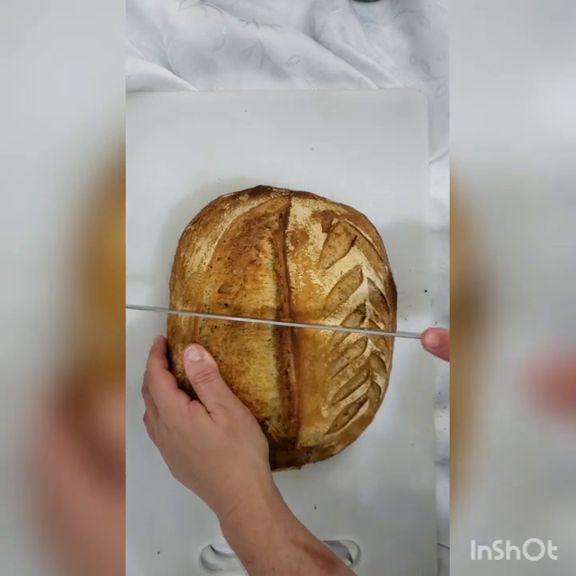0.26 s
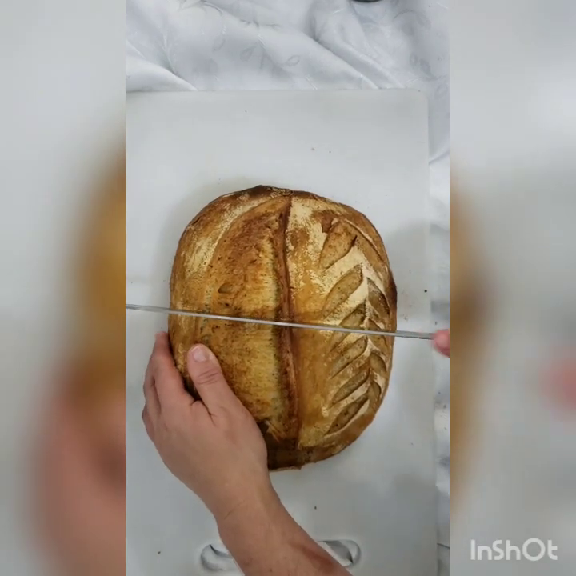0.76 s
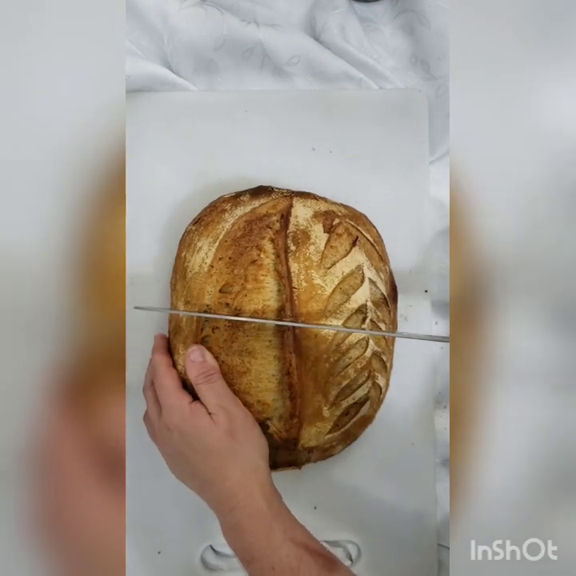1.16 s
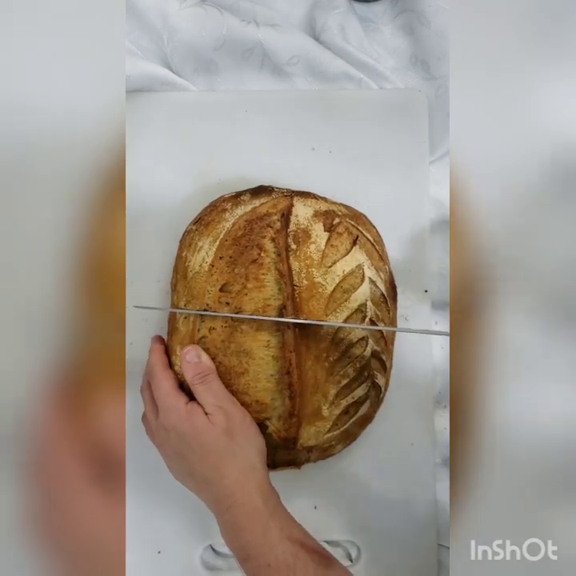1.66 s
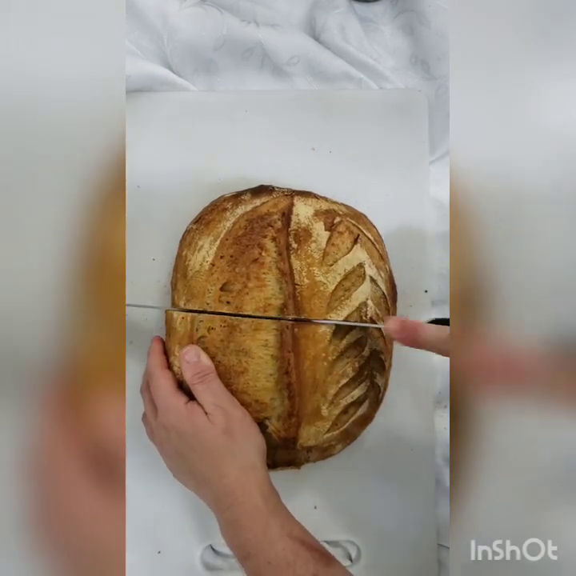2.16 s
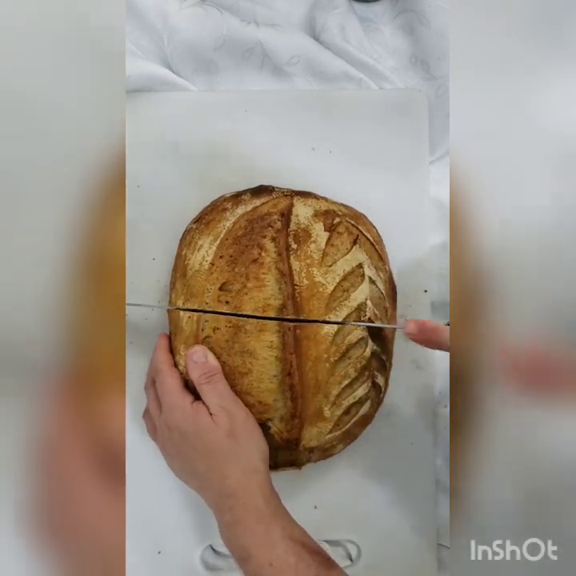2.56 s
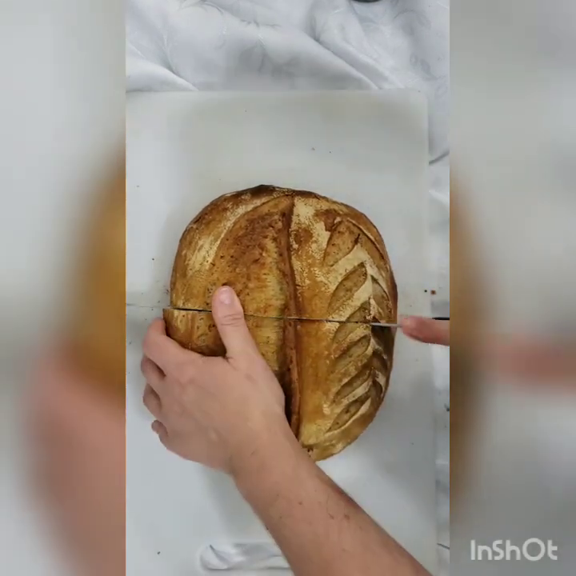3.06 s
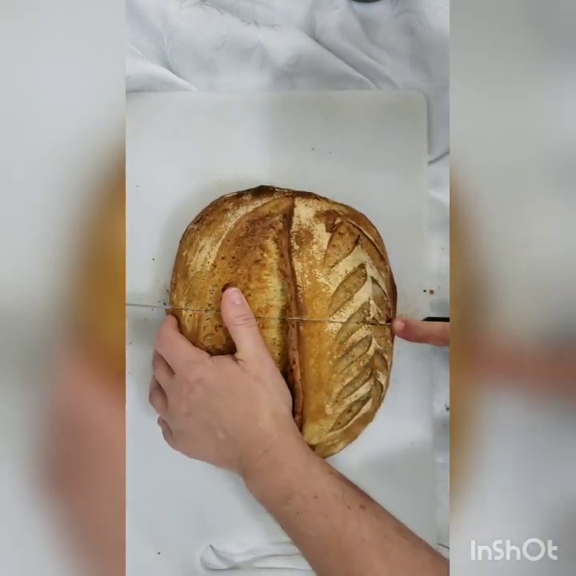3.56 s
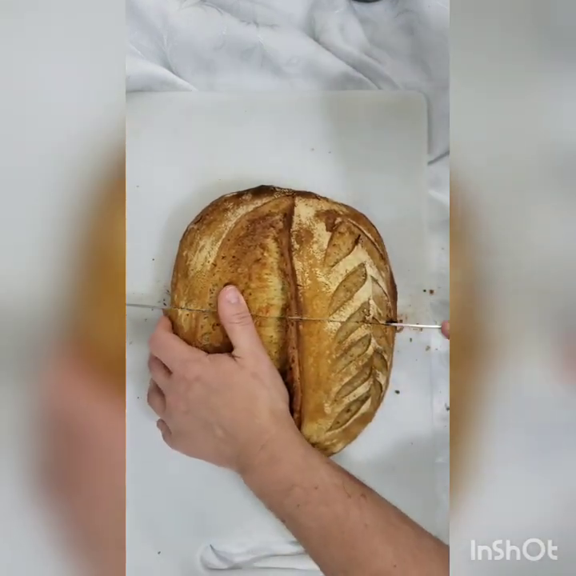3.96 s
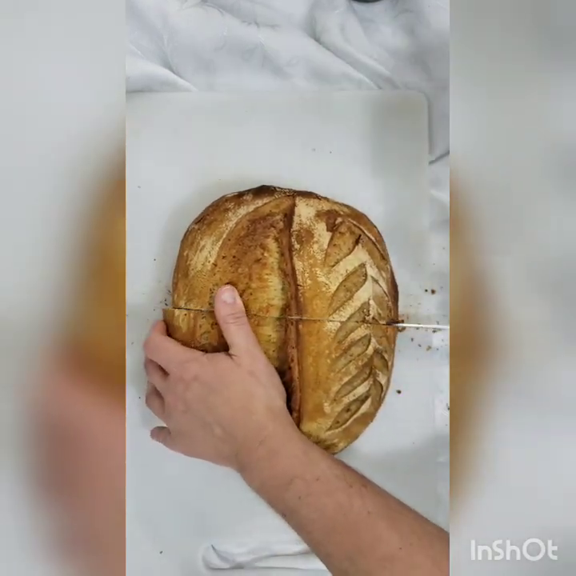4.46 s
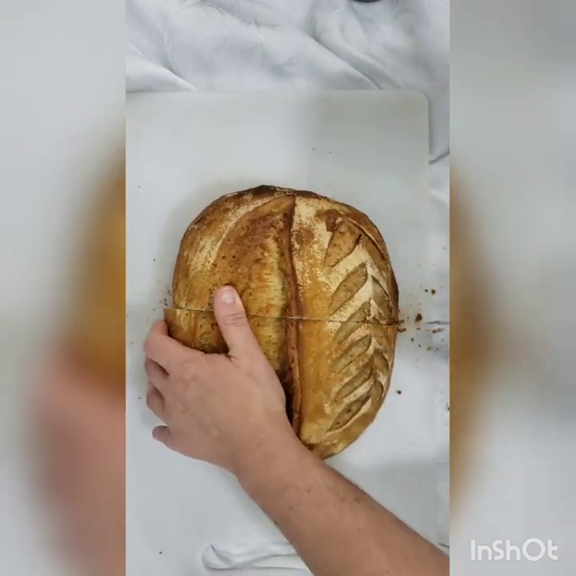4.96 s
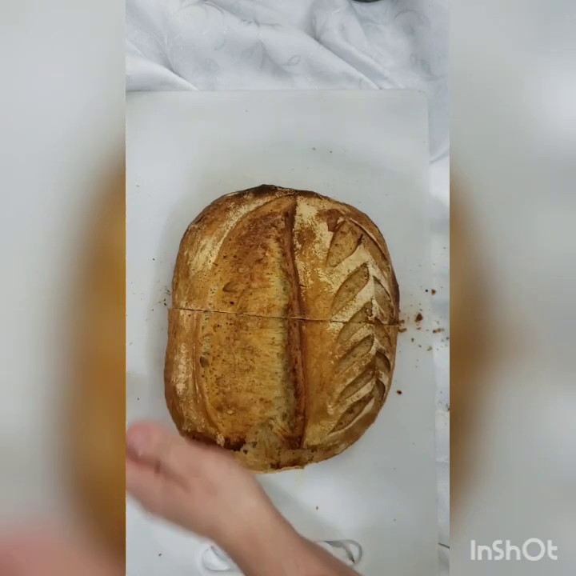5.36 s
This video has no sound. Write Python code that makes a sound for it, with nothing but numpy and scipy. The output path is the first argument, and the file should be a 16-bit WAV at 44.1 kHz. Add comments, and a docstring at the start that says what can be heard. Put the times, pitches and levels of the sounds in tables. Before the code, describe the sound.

A serrated knife saws back and forth through a crusty loaf with rasping, crackling strokes, then is put down with a short clatter.

```python
"""A serrated bread knife saws through a crusty loaf on a board: tooth pulses and crumb drag excite loaf
resonances, while coloured bursts of micro-breaks make tearing, rasp and splinters. Flakes snap off as short
noise bursts and the blade's edge ticks. The knife is laid down with a clatter of ringing modes and noise
cracks; a hand brushes with swelling hiss. A small kitchen reverberates over a low murmur and a faint hum."""
import sys
import numpy as np
from scipy import signal
from scipy.fft import rfft, irfft
from scipy.io import wavfile
from scipy.ndimage import uniform_filter1d

SR = 44100
rng = np.random.default_rng(int(sys.argv[2]) if len(sys.argv) > 2 else 0)


def to_wav(s):
    """Save 16-bit WAV."""
    ch = np.atleast_2d(s).T  # columns
    pcm = np.round(np.clip(ch, -1, 1) * 32767)  # PCM
    wavfile.write(sys.argv[1], SR, pcm.astype(np.int16))


N = 247703
T = np.arange(N) / SR  # time [s]
TOP_HZ = 15900

# Levels in the tables are relative within each layer; the mix sets the final gains.
# Blade strokes, the last three sliding out of the cut: (start [s], bite [s], hold [s], ease [s],
# lean: gain over the hold [dB], thrum [dB], knock [dB], tearing [dB], splinters [dB],
# top tooth rate [Hz], unevenness [tooth spacings])
STROKES = [ (0.0, 0.097, 0.09, 0.14, -2.5, -23.5, -31.5, -39.5, -36, 151.9, 0.097),
           (0.311, 0.079, 0.075, 0.087, 0, -30.5, -33.5, -43.5, -40.5, 168.8, 0.13),
           (0.534, 0.086, 0.22, 0.12, 2.5, -31.5, -37, -45, -40, 129.4, 0.093),
           (0.94, .079, 0.1, 0.074, 3, -37.5, -44, -47, -41, 129.6, 0.14),
           (1.205, 0.057, 0.18, 0.082, 9.5, -33.5, -37, -40.5, -38, 138, 0.19),
           (1.561, 0.049, 0.086, 0.12, -1.5, -31, -35, -45.5, -43.5, 141.6, 0.067),
           (1.813, 0.025, .21, 0.089, 6, -31, -36, -42, -36.5, 143, 0.17),
           (2.135, .05, .12, .15, -1, -47.5, -44.5, -49, -47.5, 144.7, 0.059),
           (2.424, .05, 0.18, .15, -4, -32.5, -34, -38, -33, 135.1, 0.15),
           (3.135, 0.1, 0.011, 0.077, -3, -39.5, -38, -41.5, -39, 117.6, 0.34),
           (3.329, 0.0449, 0.17, .18, -2.5, -35.5, -38, -41, -38, 141.3, 0.15),
           (3.739, 0.091, 0.041, 0.12, 2, -38, -42.5, -48, -44.5, 140.6, 0.1),
           (3.95, 0.086, 0.021, 0.092, -3.5, -42.5, -51, -53, -47.5, 122.5, 0.15),
           (4.204, 0.048, 0.081, 0.12, -2, -38.5, -41.5, -47.5, -47, 141.6, 0.17),
           (4.332, 0.029, 0.63, 0.068, 1, -40.5, -47, -55, -67.5, 140, .3),
           (4.721, 0.068, 0.036, 0.096, -8.5, -48, -50, -49.5, -58.5, 140.1, 0.14), ]
# Depth below the held level at stroke start: thrum, knock, tearing, splinters (depth [dB])
BITE_DEPTH_DB = [20.5, 20, 16.7, 18.5]
# Depth below the held level at stroke end, same layers (depth [dB])
EASE_DEPTH_DB = [13.8, 20.1, 22.4, 24.5]
# Low resonances of the loaf on its board: (frequency [Hz], width [Hz], level [dB])
THRUM_MODES = [(53.7, 18, -9.5), (84.4, 12.3, -9), (115.8, 15, -7.5), (142.6, 3.2, 4)]
# Higher resonances of the loaf: (frequency [Hz], width [Hz], level [dB])
KNOCK_MODES = [(212, 18, -5.5), (260.3, 27, 1), (298, 51, -0.5), (368.3, 25, -4.5), (468, 120, -34.5)]
# Colour of tearing crumb: (frequency [Hz], level [dB])
TEAR_COLOUR = [(250, -17.5), (480, 3.5), (590, 2.5), (650, 3), (780, 4.5), (830, -1), (890, 1), (960, 2),
               (1080, 0), (1200, 0.5), (1450, -7), (1800, -14), (3000, -28.5)]
# Colour of teeth scraping hard crust: (frequency [Hz], level [dB])
RASP_COLOUR = [(900, -13.5), (1500, -0.5), (1900, -4), (2300, -1.5), (2720, -1.5), (3050, -4), (3700, -5),
               (6000, -17.5)]
# Colour of splintering crust: (frequency [Hz], level [dB])
SPLINTER_COLOUR = [(600, -19), (1800, -4.5), (3000, -10.5), (4200, 0.5), (5500, -2), (7500, -3.5),
                   (9500, -6.5), (11500, 0.5), (13000, 2.5), (15500, -1.5)]
# Large crust flakes snapping off: (time [s], level [dB], crumbling time [s], body re treble [dB])
SNAPS = [(.031, -40, 0.0033, 1), (0.1296, -26, 0.0046, -1), (0.1521, -26.5, 0.0094, 7),
         (0.2158, -21.5, .0038, 2), (0.3666, -29, 0.0045, 2), (.532, -42, 0.0013, -6),
         (0.5727, -31.5, 0.0043, 3.5), (0.8193, -18.5, 0.00092, 7.5), (0.8941, -24, 0.0027, -4),
         (.99, -32, .002, 8), (1.2015, -30, 0.002, 7.5), (1.2539, -19, .0045, 1.5),
         (1.3286, -22.5, 0.0044, 2), (1.413, -20.5, 0.0033, 11), (1.462, -23, 0.0028, -12),
         (1.594, -28.5, 0.0024, -6), (1.7852, -29, 0.0011, 6.5), (1.8287, -27, 0.0013, -5),
         (1.8433, -23.5, 0.015, 1.5), (1.9677, -19, 0.0024, -2), (1.9879, -22, .004, 7),
         (2.3296, -28.5, 0.0015, 3), (2.451, -36, 0.0044, 16.5), (2.5417, -14.5, 0.0059, 0.5),
         (2.569, -24, 0.0038, 5), (2.6352, -25, 0.0023, -4), (3.109, -28, 0.0047, 6),
         (3.17, -34, 0.0035, -3), (3.215, -25, 0.005, -22), (3.272, -32, .003, -2), (3.348, -32, 0.0045, 5),
         (3.4077, -24, .0051, 2), (3.4506, -17, 0.0044, -25), (3.5003, -23, 0.0068, -15),
         (3.7684, -38, 0.0042, 4), (3.9871, -35.5, 0.0031, 11), (4.15, -30.5, 0.00058, -8),
         (4.5506, -35.5, 0.0011, 2), (4.6705, -40, 0.00036, -6)]
# Small chance flakes: rate, level over the splinters, its spread, crumbling time
CRUMBS_PER_S, CRUMB_DB, CRUMB_SPREAD_DB, CRUMB_S = 11, 0.5, 4, 0.0019
# Loaf rocking against its board: (time [s], level [dB])
BUMPS = [(0.095, -16), (0.162, -13.5), (0.747, -13.5), (1.988, -21), (2.58, -21), (3.373, -38),
         (4.216, -21.5), (4.383, -24)]
# Squeaks and ticks of the blade's edge: (time [s], level [dB], mean pitch [Hz], rise time [s])
TICKS = [(.152, -34, 4700, .004), (2.162, -16, 11800, .00045), (2.170, -33, 12600, .0003),
         (2.185, -28, 12500, .0003), (2.2915, -35, 14200, .0003)]
# Knife meeting board or worktop: (time [s], strength [dB], contact time [s])
BLOWS = [(1.594, -9.5, 0.00012), (2.192, -10.5, .0007), (4.219, -9, 0.0015), (4.9534, 6, 0.00014),
         (4.96, -6, .0009), (4.9614, 0.5, 0.00031), (4.9665, -4, 0.000092), (4.9713, -2.5, 0.0002),
         (4.9743, 6, 0.00025), (4.983, 0.5, 0.00014), (4.9918, 2, 0.00012), (5.01, 1.5, .0008)]
# Ringing of knife and worktop: (frequency [Hz], T60 [s], level [dB])
WORKTOP_MODES = [(144, 0.41, -22), (253, 0.3, -10), (304, 0.13, -10.5), (337, 0.046, -8),
                 (412, 0.056, -3.5), (526, 0.058, -10), (805, 0.059, -3.5), (777, 0.027, -7),
                 (1077, 0.01, 3), (1066, 0.067, -2.5), (1155, 0.044, -19), (1216, 0.023, -5.5),
                 (1510, 0.012, -25), (1730, .05, -20), (1940, 0.035, -12), (2133, 0.032, -9),
                 (2710, 0.053, -13)]
# Colour of the contact's crack: (frequency [Hz], level [dB])
CRACK_COLOUR = [(150, -24), (500, -12.5), (1200, 1), (2200, -18.5), (3200, -14), (5500, -20.5), (9000, -32),
                (16000, -42)]
# Swishes as the hand shifts its grip and lets go: (start [s], rise time [s], level [dB])
SWISHES = [(2.858, 0.071, -43), (4.74, 0.052, -53), (4.9, 0.055, -53), (5.17, 0.073, -57),
           (5.439, 0.06, -50)]
# Colour of the hand brushing: (frequency [Hz], level [dB])
BRUSH_COLOUR = [(300, -4.5), (1200, -2), (1850, -8.5), (2200, 3), (4300, 1), (6000, -1), (9000, -6.5),
                (13000, -3), (16000, -7.5)]
# Colour of the room's murmur: (frequency [Hz], level [dB])
MURMUR_COLOUR = [(25, -14), (55, 3), (90, -2), (145, 0), (200, -6), (270, -5), (420, -8), (600, -18),
                 (1500, -23), (4000, -27), (7000, -31), (8500, -37), (16000, -36)]
# Appliance hum: (frequency [Hz], rms level [dB])
HUM = [(118.4, -63.5), (236.9, -64.5), (414.5, -63)]
# Kitchen reverberation: (frequency [Hz], T60 [s])
ROOM_T60 = [(150, 0.17), (1000, 0.4), (4000, 0.35), (14000, 0.3)]


def undb(db):
    """Decibels to gain."""
    return 10 ** (np.asarray(db) / 20)


def unit(x):
    """Scale to rms 1."""
    return x / np.sqrt(np.mean(x ** 2))


def even(x, size=2200):
    """Level to rms 1 over a sliding twentieth of a second, keeping the fine grain."""
    power = np.mean(np.atleast_2d(x) ** 2, axis=0)
    return x / np.sqrt(uniform_filter1d(power, size) + 1e-6 * np.mean(x ** 2))


def add(track, start_s, sound):
    """Mix a sound in at start_s."""
    i = int(start_s * SR)
    track[..., i:i + sound.shape[-1]] += sound[..., :N - i]


def convolve(x, response):
    """Pass a sound through an impulse response."""
    return signal.fftconvolve(np.atleast_2d(x), np.atleast_2d(response), axes=-1)[:, :N]


def colour(x, points, size=2048):
    """Causal (minimum-phase) filter through (frequency [Hz], level [dB]) points."""
    hz, db = np.transpose(points)
    grid_hz = np.arange(size // 2 + 1) * SR / size
    gain = undb(np.interp(np.log(grid_hz + 1), np.log(hz), db))
    # fold the cepstrum onto positive time
    cepstrum = irfft(np.log(gain))
    cepstrum[1:size // 2] *= 2
    cepstrum[size // 2 + 1:] = 0
    return convolve(x, irfft(np.exp(rfft(cepstrum))))


def band(x, lo_hz, hi_hz, order=2):
    """Butterworth band-pass."""
    edges_hz = [lo_hz, min(hi_hz, SR / 2 - 1)]
    return signal.sosfilt(signal.butter(order, edges_hz, "band", fs=SR, output="sos"), x)


def resonate(x, modes):
    """Sum of resonances (frequency [Hz], width [Hz], level [dB])."""
    return sum(undb(db) * signal.lfilter(*signal.iirpeak(hz, hz / width_hz, fs=SR), x)
               for hz, width_hz, db in modes)


def stereo(mid, side, side_db):
    """Left and right from a shared and an opposed part."""
    return mid + undb(side_db) * side * np.array([[1], [-1]])


def swell(t, rise_s):
    """Envelope that peaks at 1 after rise_s and dies away."""
    return t / rise_s * np.exp(1 - t / rise_s)


def stroke_levels():
    """Gains of thrum, knock, tearing and splinters: each stroke bites, leans on the loaf and eases off."""
    bite_db, ease_db = np.array(BITE_DEPTH_DB)[:, None], np.array(EASE_DEPTH_DB)[:, None]
    t, power = T[::50], 0
    for start_s, bite_s, hold_s, ease_s, lean_db, *held_db, _, _ in STROKES:
        since_bite_s = t - start_s - bite_s
        biting = np.maximum(-since_bite_s / bite_s, 0)
        leaning = np.clip(since_bite_s / hold_s, 0, 1) - .5
        easing = np.maximum((since_bite_s - hold_s) / ease_s, 0)
        level_db = np.array(held_db)[:, None] - bite_db * biting + lean_db * leaning - ease_db * easing
        power = power + undb(level_db) ** 2
    return [np.interp(T, t, np.sqrt(layer)) for layer in power]


def tooth_catches(scatter_db, drag_db):
    """A pulse whenever a tooth catches, and the irregular drag of the crumb between them."""
    pulses, drag = np.zeros(N), np.zeros(N)
    for start_s, bite_s, hold_s, ease_s, *_, tooth_hz, jitter in STROKES:
        length_s = bite_s + hold_s + ease_s
        i = np.arange(max(int(start_s * SR), 0), int((start_s + length_s) * SR))
        # blade speeds up from the turn and slows into the next
        swing = (T[i] - start_s) / length_s
        speed = np.abs(np.sin(np.pi * swing)) ** .36
        passed = np.cumsum(tooth_hz * speed) / SR
        chance = rng.standard_normal((200, 2))
        teeth = np.arange(len(chance)) + .5 + jitter * chance[:, 0]
        caught = teeth < passed[-1]
        # an uneven stroke also bites with uneven force and drags more
        force_db = scatter_db * np.sqrt(abs(jitter)) * chance[caught, 1]
        pulses[i[np.searchsorted(passed, teeth[caught])]] = undb(force_db)
        drag[i] = undb(drag_db) * abs(jitter)
    return unit(pulses), drag * rng.standard_normal(N)


def fractures(catches, per_s, scatter_db, tooth_share, crumble_s):
    """Strength of breaking: cracks start at the teeth or on their own and each runs on for a moment."""
    stray_db = scatter_db * np.clip(rng.standard_normal(N), -2, 2)
    stray = (rng.random(N) < per_s / SR) * undb(stray_db)
    power = tooth_share * catches ** 2 / np.mean(catches ** 2) + stray ** 2 / np.mean(stray ** 2)
    return np.sqrt(signal.lfilter([1], [1, -np.exp(-1 / (crumble_s * SR))], power) + 1e-9)


def grit(per_s, side_db):
    """Dense microscopic breaks, each radiating differently to the two channels."""
    breaks = rng.random(N) < per_s / SR
    return unit(stereo(breaks * rng.standard_normal(N), breaks * rng.standard_normal(N), side_db))


def flakes(x, spread_db, per_s):
    """Fragments of changing size: third-octaves from 700 Hz up, and all below, flare independently."""
    edges_hz = np.concatenate([[0], 700 * 2 ** (np.arange(14) / 3), [SR]])
    spectrum = rfft(x, 2 ** 18)
    hz = np.arange(2 ** 17 + 1) * SR / 2 ** 18
    out = 0
    for lo_hz, hi_hz in zip(edges_hz, edges_hz[1:]):
        chance = np.clip(rng.standard_normal(4096), -2, 2)
        flare = np.interp(T * per_s, np.arange(len(chance)), undb(spread_db * chance))
        out = out + flare * irfft(spectrum * ((hz >= lo_hz) & (hz < hi_hz)))[:, :N]
    return out


def loaf(push, modes, lo_hz, hi_hz, side_db):
    """The blade's push shakes one group of the loaf's resonances."""
    return even(band(resonate(stereo(push, rng.standard_normal(N), side_db), modes), lo_hz, hi_hz))


def resistance(spread_db, per_s):
    """Gain drifting at random: the crust is harder in some places than in others."""
    chance = np.clip(rng.standard_normal(1024), -2, 2)
    return np.interp(T * per_s, np.arange(len(chance)), undb(spread_db * chance))


def sawing(thrum_gain, knock_gain, tear_gain, splinter_gain):
    """The same teeth drive the loaf's thrum and knock, the tearing crumb, the rasp and the splinters."""
    catches, drag = tooth_catches(scatter_db=5, drag_db=14.0)
    breaking = fractures(catches, per_s=380, scatter_db=4, tooth_share=.28, crumble_s=.0034)
    thrum = loaf(catches + drag, THRUM_MODES, lo_hz=44.4, hi_hz=178, side_db=-19.5)
    knock = loaf(catches + drag, KNOCK_MODES, lo_hz=179, hi_hz=478, side_db=-38)
    tear = even(colour(breaking * grit(per_s=5000, side_db=-9.0), TEAR_COLOUR))
    scrape = flakes(breaking * grit(per_s=4000, side_db=-7), spread_db=2.0, per_s=92)
    rasp = even(colour(scrape, RASP_COLOUR))
    shards = flakes(breaking * grit(per_s=7000, side_db=0), spread_db=3.0, per_s=140)
    splinter = even(colour(shards, SPLINTER_COLOUR))
    body = thrum_gain * thrum + knock_gain * knock + tear_gain * tear
    # rasp needs both pressure and hard crust, so it fades when the blade only slides
    rasp_gain = undb(-3.0) * np.sqrt(tear_gain * splinter_gain)
    crust = rasp_gain * rasp + splinter_gain * splinter
    return resistance(spread_db=1.66, per_s=23) * (body + crust)


def background():
    """Low room murmur of coloured noise with steady hum sines."""
    murmur = colour(stereo(*rng.standard_normal((2, N)), side_db=-8.5), MURMUR_COLOUR)
    hum = sum(undb(db) * np.sqrt(2) * np.sin(2 * np.pi * (hz * T + rng.random())) for hz, db in HUM)
    return undb(-55.5) * unit(murmur) + hum


def crumbs(splinter_gain, count=150):
    """Small chance snaps that follow the splintering level at that moment; rows as in SNAPS."""
    times_s = np.cumsum(rng.exponential(size=count)) / CRUMBS_PER_S
    over_db = CRUMB_DB + CRUMB_SPREAD_DB * np.clip(rng.standard_normal(count), -2, 2)
    levels_db = 20 * np.log10(np.interp(times_s, T, splinter_gain) + 1e-9) + over_db
    return [(s, db, CRUMB_S, 2) for s, db in zip(times_s, levels_db) if s < T[-1]]


def snaps(rows, size=1600):
    """A flake gives way in a quick run of tiny breaks that starts and stops abruptly."""
    bright, dull, t = np.zeros((2, N)), np.zeros((2, N)), T[:size]
    chances = rng.standard_normal((200, 3, size))
    for (start_s, db, crumble_s, body_db), chance in zip(rows, chances):
        burst = chance[:2] * np.sqrt(np.abs(chance[2])) * np.exp(-(t / crumble_s) ** 4)
        burst *= undb(db) * np.sqrt(crumble_s * SR / np.sum(burst ** 2))
        add(bright, start_s, stereo(*burst, side_db=-1.5))
        add(dull, start_s, stereo(*burst, side_db=-7.0) * undb(body_db))
    treble = flakes(band(bright, 3100, 15000), spread_db=2.0, per_s=160)
    body = band(dull, 550, 5070)
    return undb(-3.0) * treble + undb(-7.5) * body


def bumps(bump_hz=122, size=1800):
    """A heavy, almost dead swing of the loaf: a short enveloped sine."""
    out, t = np.zeros(N), T[:size]
    for start_s, db in BUMPS:
        add(out, start_s, undb(db - 5.0) * np.sin(2 * np.pi * bump_hz * t) * swell(t, rise_s=0.0053))
    return out


def ticks(waver_hz=900, size=1400):
    """Very short high pings of the steel edge, rough in pitch."""
    out, t = np.zeros(N), T[:size]
    for start_s, db, hz, rise_s in TICKS:
        pitch_hz = hz + waver_hz * unit(uniform_filter1d(rng.standard_normal(size), size=14))
        ping = np.sin(2 * np.pi * np.cumsum(pitch_hz) / SR)
        add(out, start_s, undb(db) * ping * swell(t, rise_s) ** 2)
    return out * undb([[-1.5], [1.5]])  # a little to the right


def knife_down(size=14000):
    """Handle and blade strike and ring the worktop modes; a longer contact gives a duller blow."""
    rings, cracks, t = np.zeros((2, N)), np.zeros((2, N)), T[:size]
    hz, t60_s, mode_db = np.transpose(WORKTOP_MODES)[:, :, None]
    for start_s, db, contact_s in BLOWS:
        push = np.exp(-t[:size // 20] / contact_s * 2)
        push *= undb(db) / push.sum()
        # modes swing with alternating sign, a little differently in each channel
        phase = np.pi * np.arange(len(hz))[:, None] + 0.33 * rng.standard_normal((2, *hz.shape))
        decay = undb(mode_db - 60 * t / t60_s)
        ring = np.sum(decay * np.sin(2 * np.pi * hz * t + phase), axis=1)
        crack = stereo(*rng.standard_normal((2, size)), side_db=-6) * np.exp(-t / .004)
        add(rings, start_s, signal.fftconvolve(ring, push[None], axes=1))
        add(cracks, start_s, signal.fftconvolve(crack, push[None], axes=1))
    return undb(-26.5) * rings + undb(-12.5) * colour(cracks, CRACK_COLOUR)


def hand():
    """Skin sliding lightly: a fine, smooth hiss that swells and fades with each move."""
    moves = sum(undb(db) * swell(np.maximum(T - start_s, 0), rise_s) ** 2
                for start_s, rise_s, db in SWISHES)
    return unit(colour(grit(per_s=5300, side_db=0.0), BRUSH_COLOUR)) * moves


def kitchen(x, wet_db, bass_db, size=22000):
    """Diffuse reflections of hard kitchen walls: octave noise bands, each with its own decay."""
    t, tail = T[:size], 0
    hz, t60_s = np.transpose(ROOM_T60)
    for centre_hz in 125 * 2 ** np.arange(8):
        decay = undb(-60 * t / np.interp(np.log(centre_hz), np.log(hz), t60_s))
        weight = undb(bass_db * 125 / centre_hz)
        noise = band(rng.standard_normal((2, size)), centre_hz / np.sqrt(2), centre_hz * np.sqrt(2))
        tail = tail + weight * decay * noise
    tail *= np.minimum(t / 0.0061, 1)  # fade-in [s]
    return x + undb(wet_db) * convolve(x, tail / np.sqrt(np.sum(tail ** 2) / 2))


def scene():
    """Everything on the worktop sounds into the same room, slightly left of centre."""
    thrum, knock, tear, splinter = stroke_levels()
    near = sawing(thrum, knock, tear, splinter)
    near = near + snaps(SNAPS + crumbs(splinter)) + bumps() + ticks() + knife_down() + hand()
    return kitchen(near, wet_db=-4.0, bass_db=-19.5) * undb([[.2], [-.7]]) + background()


def record(dry):
    """The phone cuts the deepest bass and the top."""
    x = signal.sosfilt(signal.butter(4, 38, "high", fs=SR, output="sos"), dry)
    return signal.sosfilt(signal.ellip(10, .2, 70, TOP_HZ, fs=SR, output="sos"), x)


dry = scene()
out = record(dry)
to_wav(out)
```